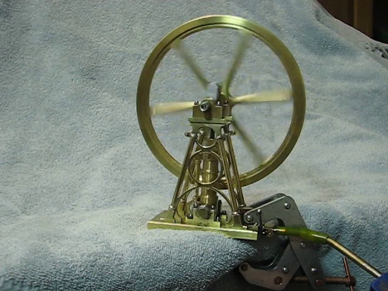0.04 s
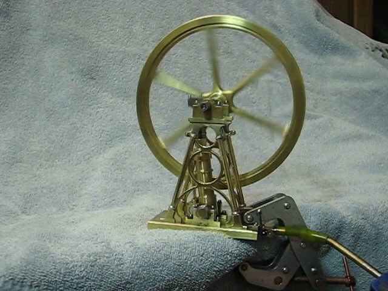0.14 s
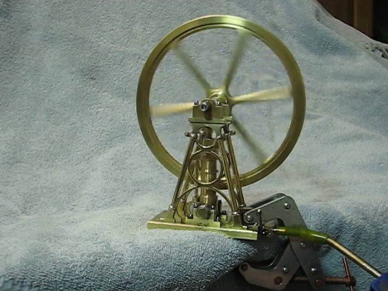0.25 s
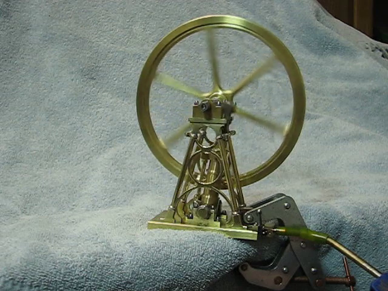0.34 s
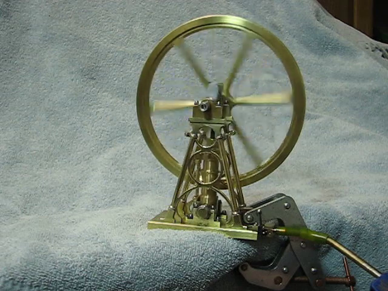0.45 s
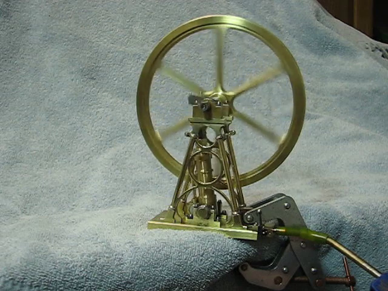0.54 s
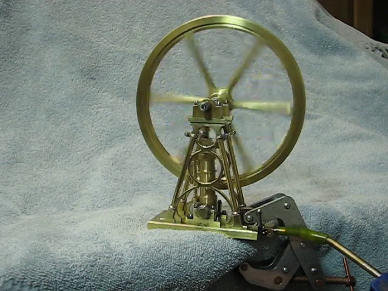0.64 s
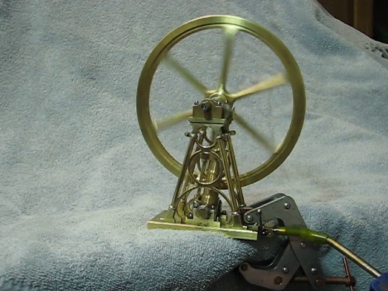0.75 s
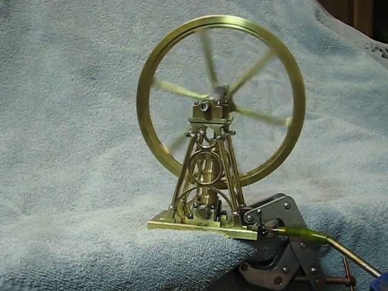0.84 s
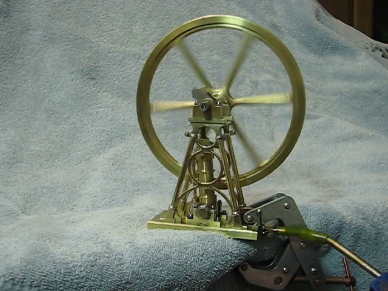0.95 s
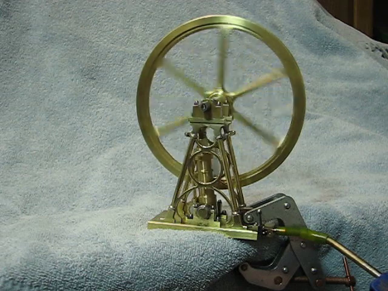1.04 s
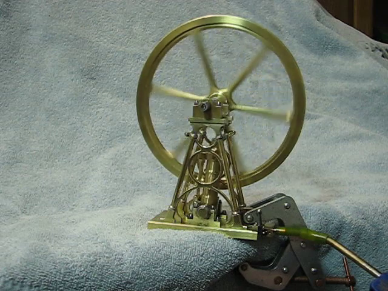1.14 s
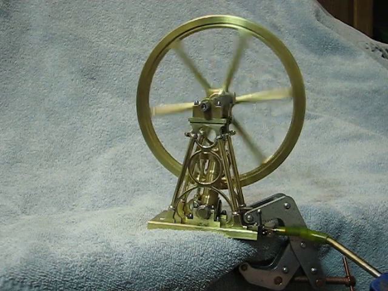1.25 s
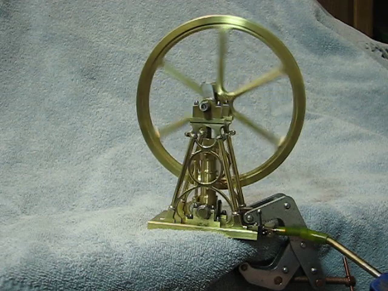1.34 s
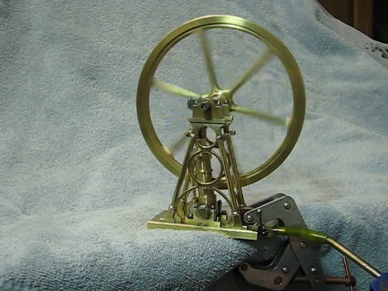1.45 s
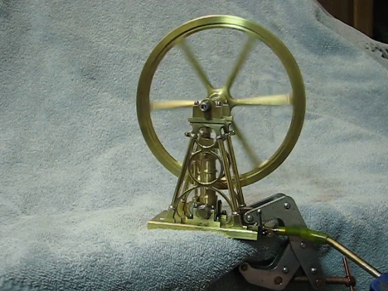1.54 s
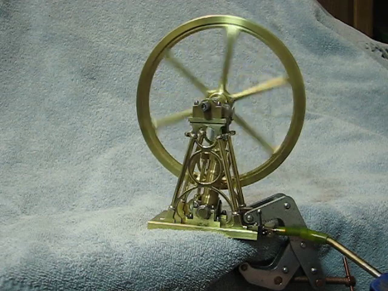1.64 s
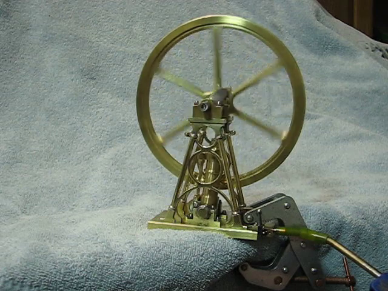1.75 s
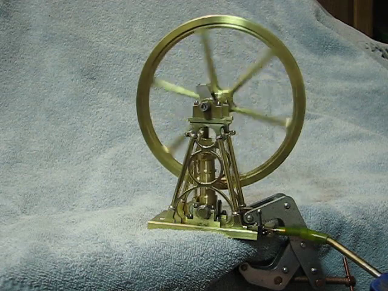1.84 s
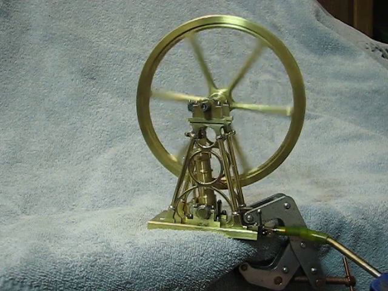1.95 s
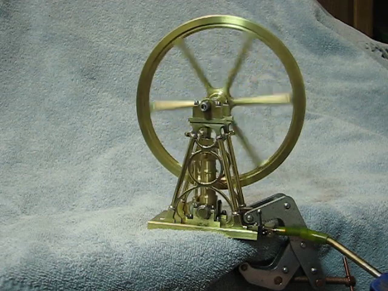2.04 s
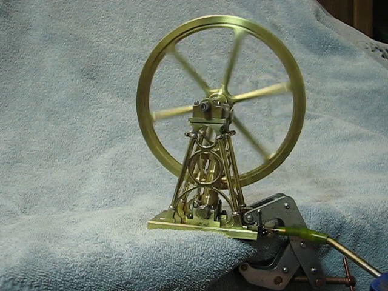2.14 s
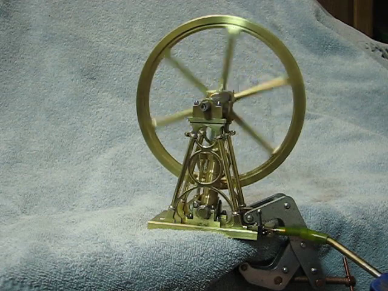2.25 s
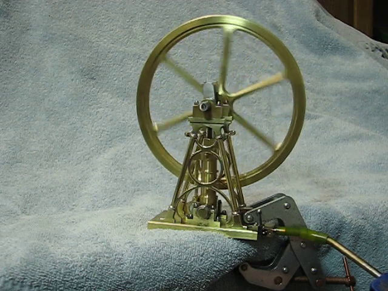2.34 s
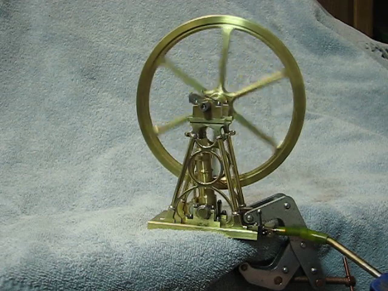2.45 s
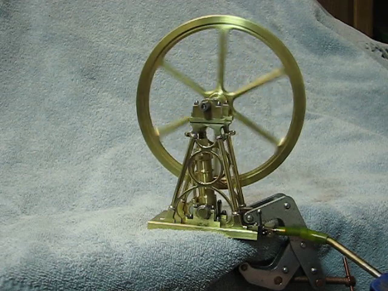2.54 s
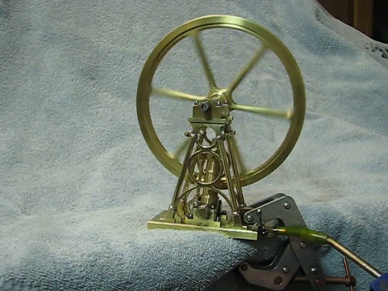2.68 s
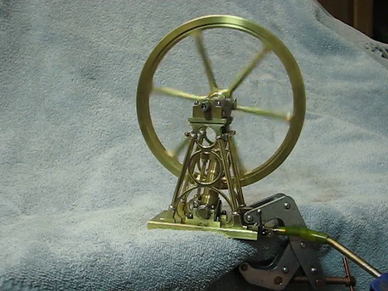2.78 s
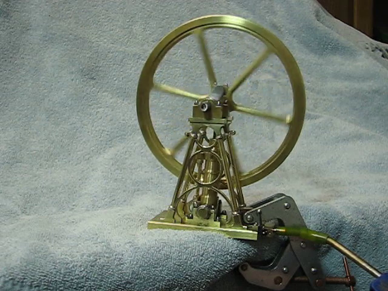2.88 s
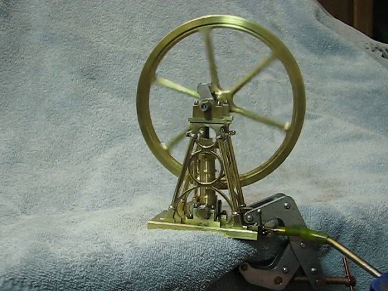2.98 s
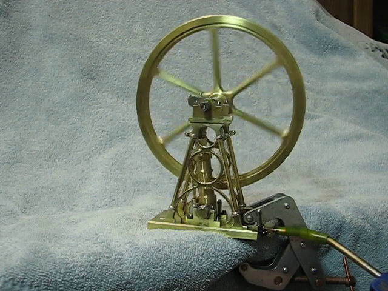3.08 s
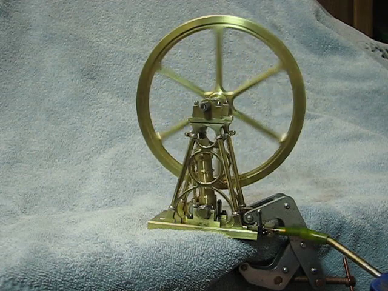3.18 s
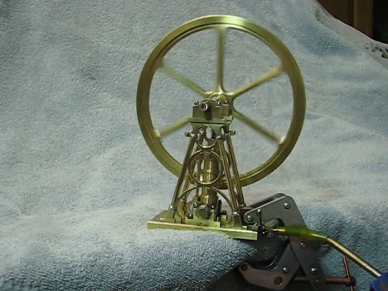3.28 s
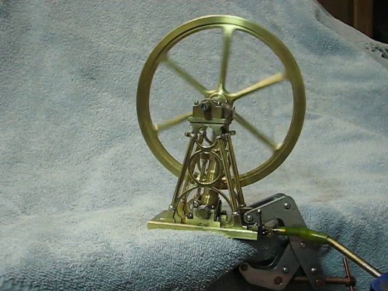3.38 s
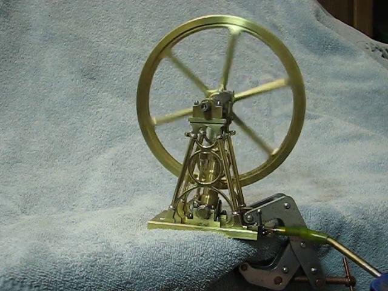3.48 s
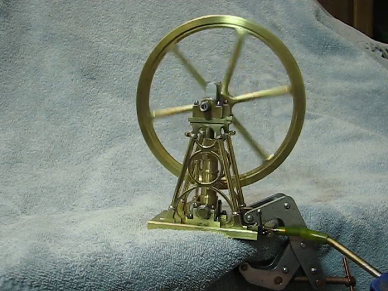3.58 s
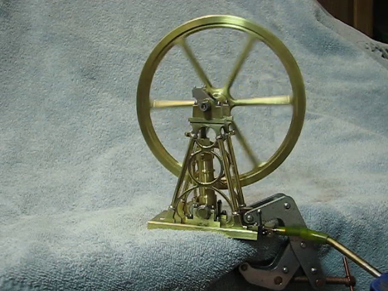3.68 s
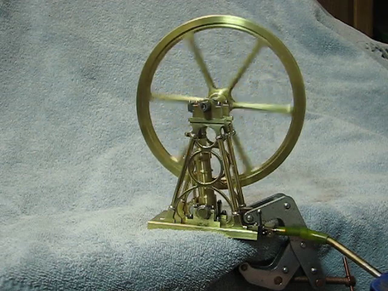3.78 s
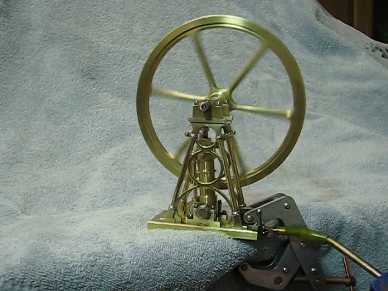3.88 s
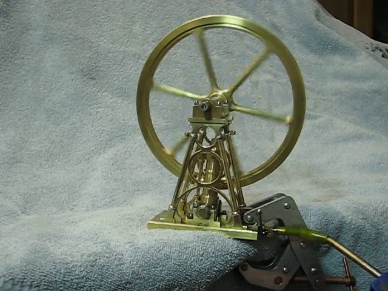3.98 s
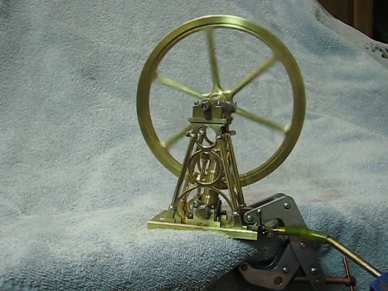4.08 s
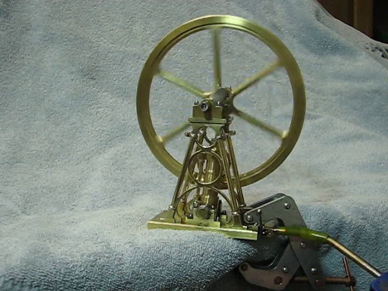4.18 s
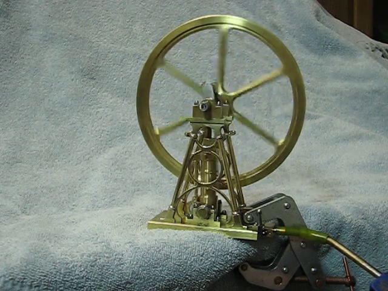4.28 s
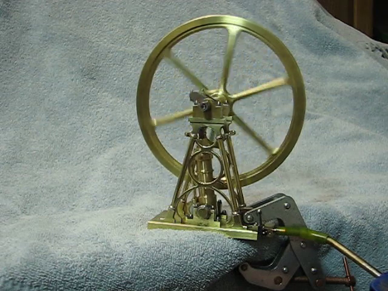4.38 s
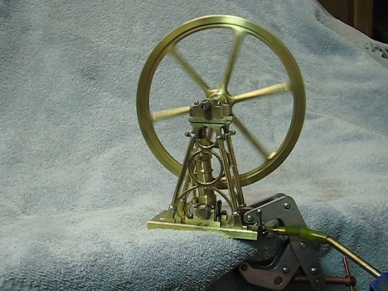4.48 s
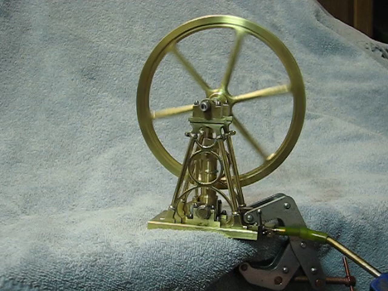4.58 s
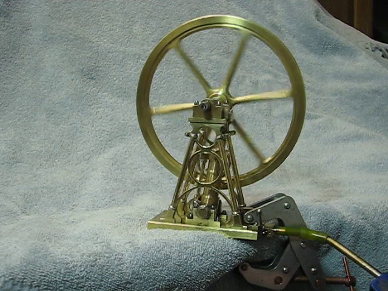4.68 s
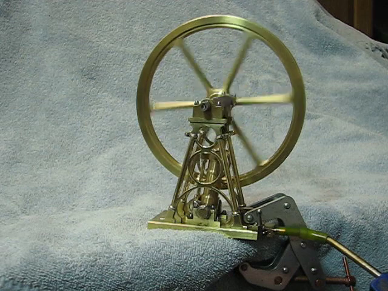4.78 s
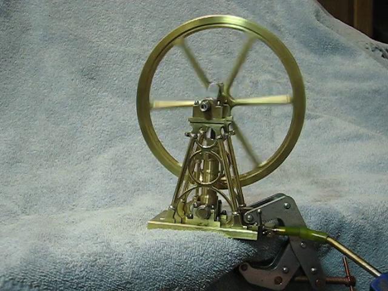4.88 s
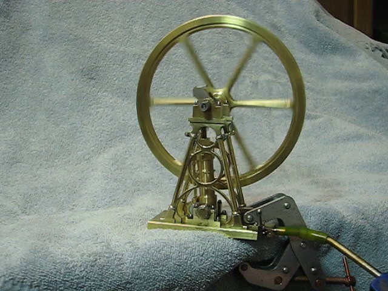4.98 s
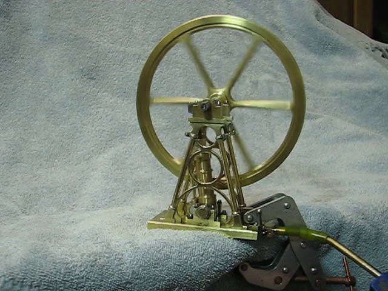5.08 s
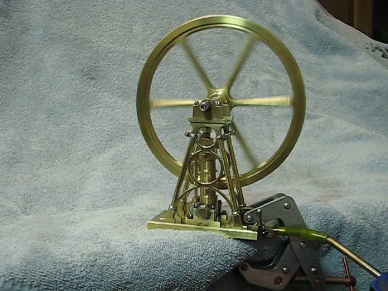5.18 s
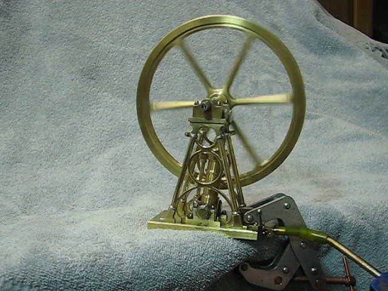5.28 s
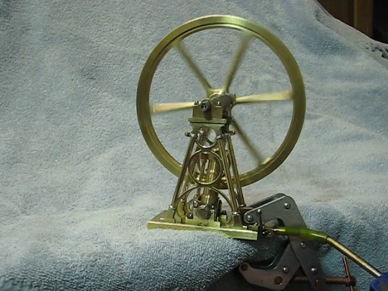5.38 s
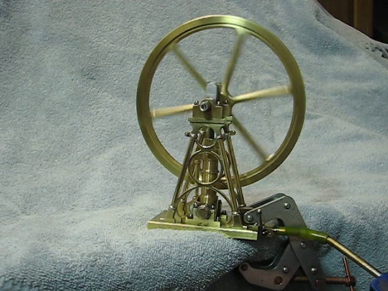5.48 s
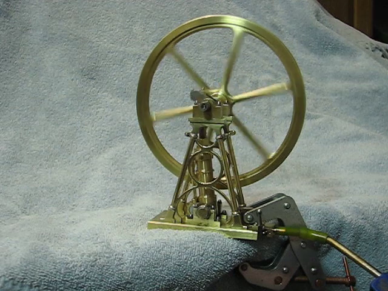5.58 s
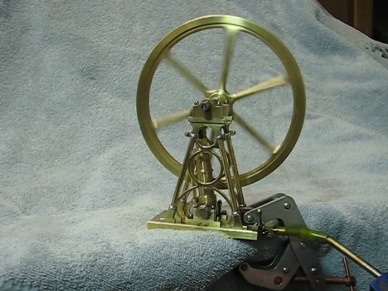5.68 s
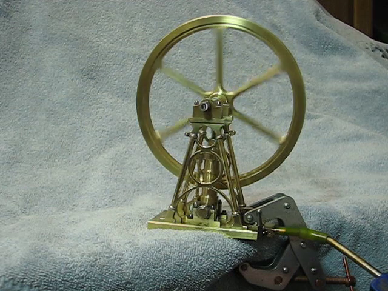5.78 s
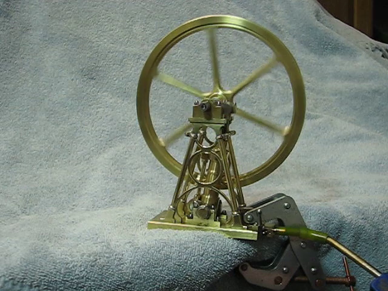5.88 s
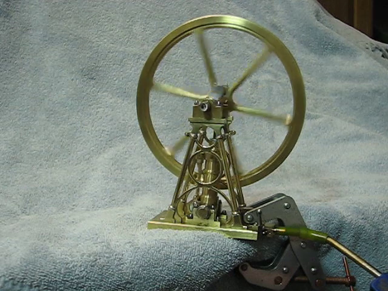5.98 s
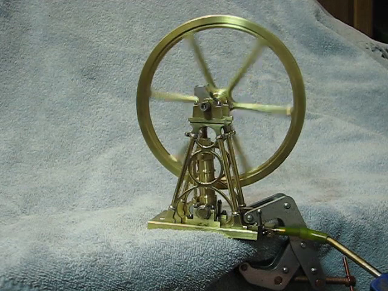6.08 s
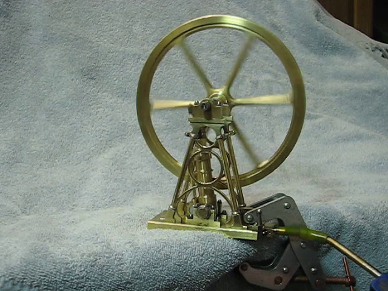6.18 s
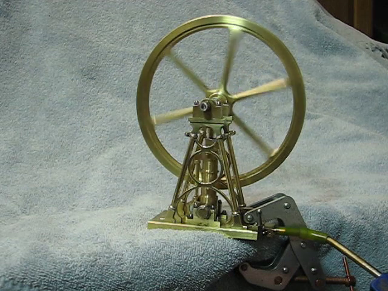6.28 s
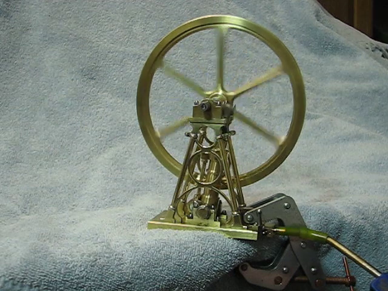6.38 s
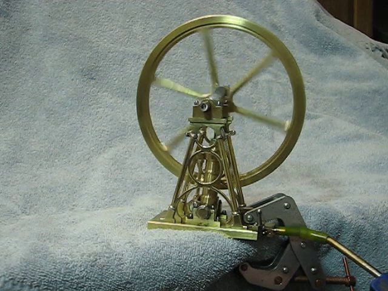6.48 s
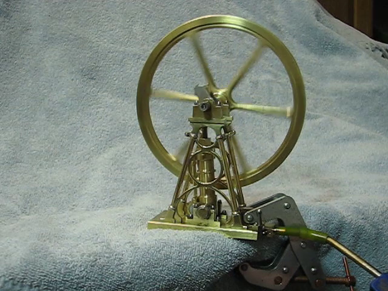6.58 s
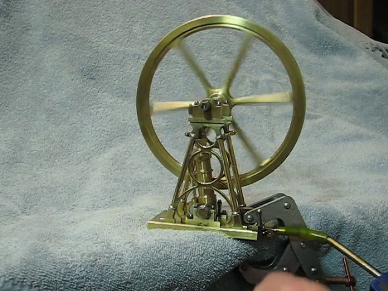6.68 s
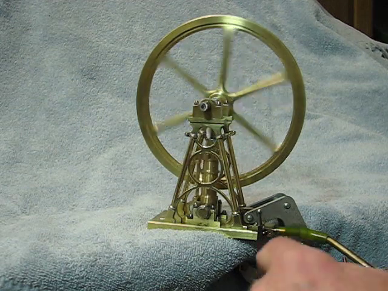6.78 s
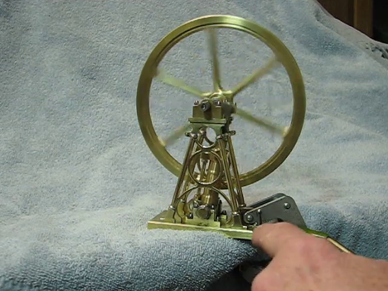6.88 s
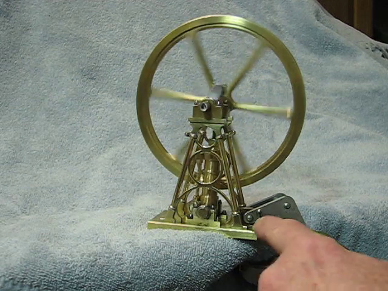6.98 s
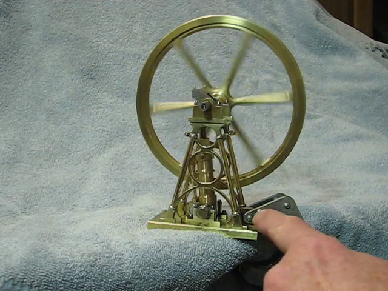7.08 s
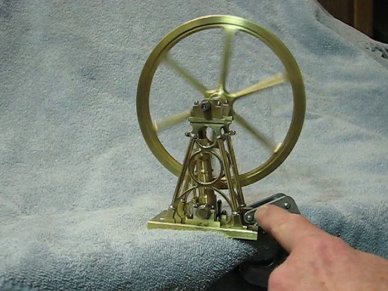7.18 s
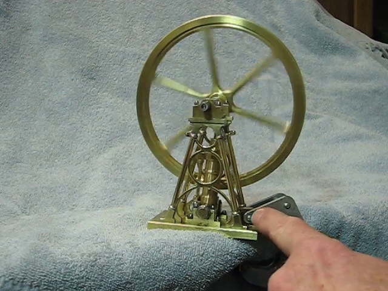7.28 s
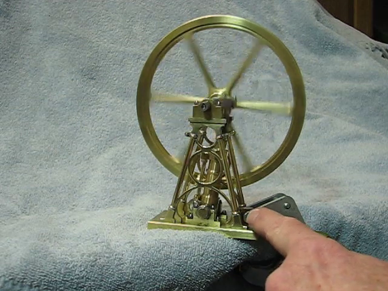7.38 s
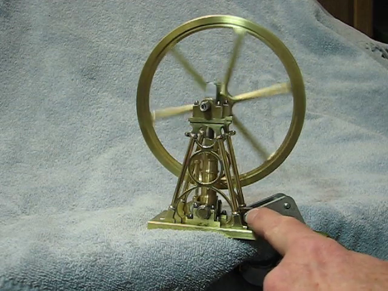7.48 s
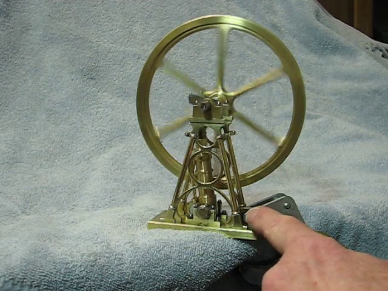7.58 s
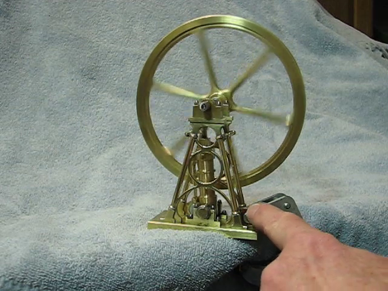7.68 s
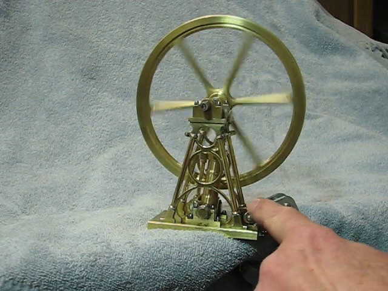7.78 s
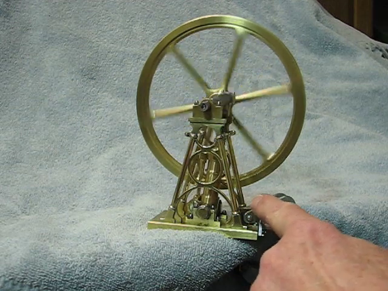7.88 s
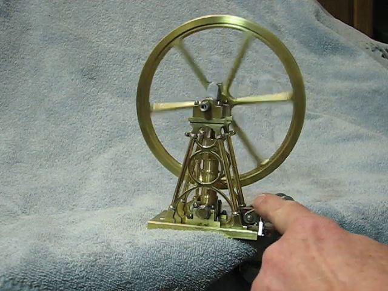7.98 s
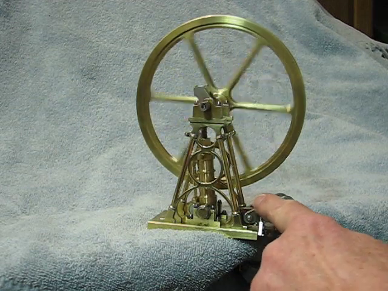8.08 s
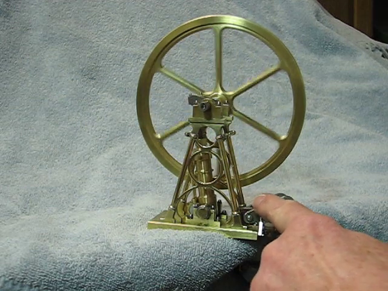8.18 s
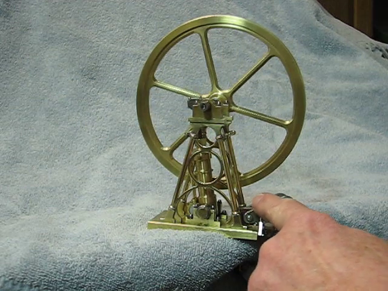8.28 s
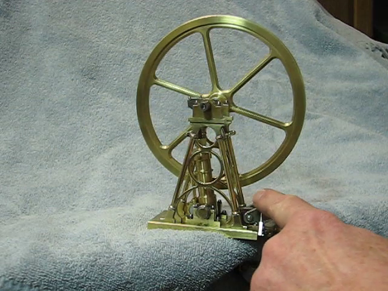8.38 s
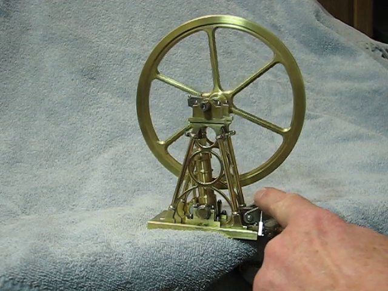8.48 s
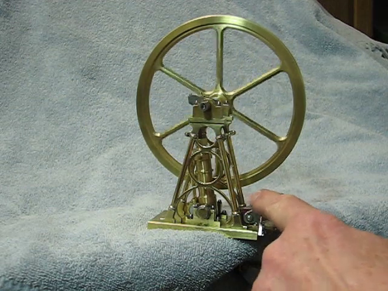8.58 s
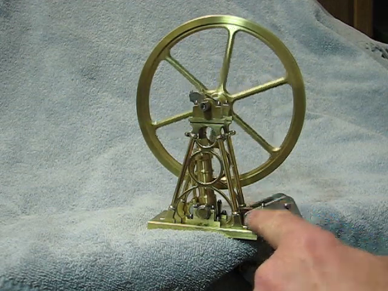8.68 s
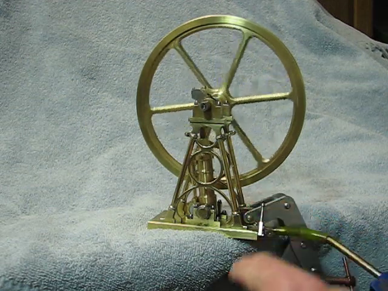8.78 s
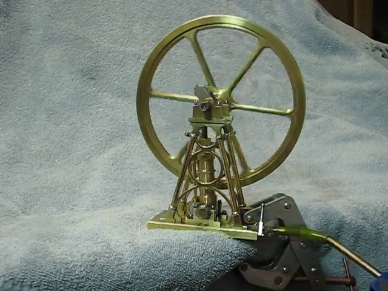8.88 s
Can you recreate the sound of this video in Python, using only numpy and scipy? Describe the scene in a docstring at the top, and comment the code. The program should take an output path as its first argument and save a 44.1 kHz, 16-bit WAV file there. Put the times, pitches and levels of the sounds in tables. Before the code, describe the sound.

Close up indoors, a miniature steam engine puffs in a quick, regular rhythm, each turn a sharp chuff followed by a sputtering swell of steam. The pace sags, then recovers as the hiss and spitting grow stronger. The engine stops abruptly, leaving one feeble stroke and two soft sighs of vapour over a thin leaking hiss and faint electrical hum.

```python
"""A small brass model steam engine runs close by on a towel, about two turns a second, over a hissing
leak, a thin whistle and mains hum. The crank angle times each turn: a sharp-edged chuff, a spit as the
valve crosses over, then a swelling puff, all turbulent flow that rings the passages and sputters with
moisture. The wheel slows, then picks up; steam pressure and speed set the strength and brightness.
Near the end a finger cuts the supply: one weak stroke follows, and a little dry vapour sighs out."""
import sys
import numpy as np
from scipy import signal
from scipy.fft import irfft
from scipy.io import wavfile

SR = 44100
rng = np.random.default_rng(int(sys.argv[2]) if len(sys.argv) > 2 else 0)


def output_pcm(signal):
    """Save a mono or channel-first signal as 16-bit PCM at the path in sys.argv[1].

    Samples are clipped to [-1, 1] before scaling.
    """
    pcm = np.clip(np.atleast_2d(signal).T, -1, 1) * 32767
    wavfile.write(sys.argv[1], SR, np.round(pcm).astype(np.int16))


N = 394235
TIME = np.arange(N) / SR
FREQS = np.maximum(np.fft.rfftfreq(N, 1 / SR), 1)

# flywheel turns and their relative sputter: start_s, chuff_db, spit_db, swell_db
FLYWHEEL_TURNS = [(-0.07, -21, -41, -21.5), (0.323, -22.2, -35, -21), (0.74, -23.5, -31.5, -21),
                  (1.18, -22.5, -35.5, -23), (1.638, -23.5, -42, -25), (2.143, -23, -39.5, -24),
                  (2.711, -24.5, -42, -24.5), (3.352, -22, -31.5, -26.5), (4.021, -22.5, -28.5, -25),
                  (4.683, -22.8, -22, -20.5), (5.288, -24, -21, -20.5), (5.842, -23.5, -22, -20.5),
                  (6.355, -23.5, -21.5, -20), (6.851, -23.3, -24, -20.5), (7.324, -23, -25, -21)]
SPIT_WIDTH_S = .0125


def from_db(db):
    """Amplitude grows tenfold every 20 decibels."""
    return 10 ** (np.asarray(db) / 20)


def rms_one(x):
    """Normalisation to unit mean power."""
    return x / np.sqrt(np.mean(x ** 2) + 1e-20)


def together(*gains):
    """Incoherent sources add in power."""
    return np.sqrt(sum(gain ** 2 for gain in gains))


def hump(offset, width):
    """A Gaussian pulse of height 1."""
    return np.exp(-.5 * np.minimum(np.abs(offset / width), 10) ** 2)


def in_time(rows):
    """Linear interpolation of a table's columns over time."""
    time_s, *columns = np.transpose(rows)
    return [np.interp(TIME, time_s, c) for c in columns]


def over_hz(rows):
    """Interpolation of a table's columns over log frequency."""
    hz, *columns = np.transpose(rows)
    return [np.interp(np.log(FREQS), np.log(hz), c) for c in columns]


def drift(rate_hz):
    """Slow random modulation of unit rms."""
    knots = rng.standard_normal(8192)
    return rms_one(np.interp(TIME * rate_hz, np.arange(len(knots)), knots))


def stereo_noise(colour=1):
    """Partial coherence: left and right share the noise to a degree that varies with frequency."""
    # likeness of the two sides: frequency_hz, coherence, left_lead_rad
    stereo_field = [(100, 0.92, 0.5), (298, .92, 0.03), (600, 0.55, 0.14), (1200, 0.92, 0.5),
                    (2650, 0.75, -0.14), (3500, 0.48, -1), (4530, 0.96, 0.5), (5400, 0.77, 1),
                    (6400, .99, -.5), (6920, .995, -1), (8300, 0.35, 1.45), (9550, 1, -0.9),
                    (10350, 0.4, -2.8), (12600, 0.5, -2), (15100, 0.2, -5.5)]
    coherence, lead = over_hz(stereo_field)
    mid, side = rng.standard_normal((2, len(FREQS))) + 1j * rng.standard_normal((2, len(FREQS)))
    mid, side = np.sqrt(1 + coherence) * mid, np.sqrt(1 - coherence) * side
    return rms_one(irfft(colour * np.array([(mid + side) * np.exp(1j * lead), mid - side]), N))


def resonate(turbulence, modes, grain=1):
    """Forced resonance: each mode band-passes its own stretch of turbulence twice; unit rms."""
    out = 0
    for hz, width_hz, level_db, pan_db in modes:
        radius = np.exp(-np.pi * width_hz / SR)
        section = [1, 0, -1, 1, -2 * radius * np.cos(2 * np.pi * hz / SR), radius ** 2]
        drive = np.roll(turbulence, rng.integers(N), axis=1) * grain
        sides = rms_one(from_db([[pan_db / 2], [-pan_db / 2]]))
        out = out + from_db(level_db) * sides * rms_one(signal.sosfilt([section, section], drive))
    return rms_one(out)


def pressure(full_db=-42.5):
    """Steam pressure drives the flows; in dB relative to full pressure."""
    # steam pressure on a loudness scale: time_s, level_db
    pressure_curve = [(0.0, -49), (1.16, -47), (1.58, -51), (1.67, -56), (2.68, -55), (2.83, -58),
                      (3.31, -50), (3.93, -48), (5.02, -42), (7.52, -44), (7.58, -46)]
    return in_time(pressure_curve)[0] - full_db


def supply(cut_s=7.72, fall_db_per_s=800):
    """Throttling: the supply's gain decays exponentially once it is pinched off."""
    return from_db(-np.clip(fall_db_per_s * (TIME - cut_s), 0, 120))


def crank(end_s=7.782):
    """Rotation times the valve: turn number, angle (turns) and speed (turns a second)."""
    starts = np.append(np.transpose(FLYWHEEL_TURNS)[0], end_s)
    turns = np.interp(TIME, starts, np.arange(len(starts)))
    turn = np.minimum(turns.astype(int), len(FLYWHEEL_TURNS) - 1)
    return turn, turns - turn, 1 / np.diff(starts)[turn]


def strength(engine, level_db, per_pressure, per_speed, cruise_hz=2):
    """A flow's gain is a power law of pressure and wheel speed; slopes in dB per dB."""
    _, speed, pressure_db = engine
    return from_db(level_db + per_pressure * pressure_db + per_speed * 20 * np.log10(speed / cruise_hz))


def chuff(engine, dome_db, crack_db, open_s=.0095, shut_s=.0075, crack_s=.01):
    """Blowdown: pent-up pressure cracks out of the port, then flow follows the piston's speed."""
    angle, speed, pressure_db = engine
    shut_angle = .259 + .0014 * pressure_db
    since_open, since_shut = angle / speed, np.maximum(angle - shut_angle, 0) / speed
    stroke = np.minimum(2 * angle / shut_angle - 1, 1)  # 0 at mid-stroke
    port = np.minimum(since_open / open_s, 1) * np.exp(-since_shut / shut_s)
    return port * from_db(crack_db * np.exp(-since_open / crack_s) - dome_db * stroke ** 2)


def droplets(per_s=650, spread_db=2, burst_s=.00047, smooth_share=.5, clump_db=1.12, clump_hz=110):
    """Shot noise: droplets tear off the port at random and make the flow's envelope grainy."""
    sizes = from_db(spread_db * np.minimum(rng.exponential(1, N), 3))
    born = rng.random(N) < per_s / SR
    power = signal.lfilter([1], [1, -np.exp(-1 / (burst_s * SR))], born * sizes ** 2 + 1e-18)
    clumps = from_db(clump_db * drift(clump_hz))
    return np.sqrt(smooth_share + (1 - smooth_share) * power / power.mean()) * clumps


def leak(turbulence, full_db=-40.2, shut_db=-44.5):
    """Jet noise at the glands follows the pressure, then holds its level after the cut."""
    # resonances of the gaps: centre_hz, width_hz, level_db, pan_db
    gland_modes = [(645, 770, -16.5, 0), (1765, 1160, -9.5, -1), (3080, 1800, -4.5, -4),
                   (4160, 1100, -6.5, 15), (5150, 1800, -3, -10), (6620, 1000, -4, 17),
                   (7320, 1200, -1.5, -24), (8330, 630, -1, -4), (9800, 3300, -3, 5.5),
                   (12250, 650, -10, 1), (13350, 700, -12, 6), (14100, 2200, -12, -5)]
    fed = supply()
    level_db = fed * (full_db + 1.17 * pressure()) + (1 - fed) * shut_db
    return from_db(level_db + .8 * drift(25)) * resonate(turbulence, gland_modes)


def whistle(gain_db=5.3, width_hz=330, skirt_hz=750, pan_db=-11.5, lead_rad=-2.1):
    """A pinhole jet resonates in a narrow band of hiss with soft skirts."""
    # course of the jet's tone: time_s, relative_db, pitch_hz
    pinhole_tone = [(0.0, -57, 13000), (0.42, -55, 13000), (3.81, -55, 13000), (4.46, -52, 13100),
                    (6.27, -54, 13100), (6.62, -57, 13100), (8.09, -59, 13100), (8.94, -57, 13100)]
    level_db, pitch_hz = in_time(pinhole_tone)
    cycles = np.cumsum(pitch_hz) / SR
    flutter = rng.standard_normal(N) + 1j * rng.standard_normal(N)
    for band_hz in (width_hz, skirt_hz):
        flutter = signal.lfilter([1], [1, -np.exp(-np.pi * band_hz / SR)], flutter)
    sides = np.array([[from_db(pan_db) * np.exp(1j * lead_rad)], [1]])
    return from_db(level_db + gain_db) * rms_one(np.real(flutter * np.exp(2j * np.pi * cycles) * sides))


def room_tone():
    """Broadband rumble lies under mains hum, whose lines are broadened by random modulation."""
    # spectral density of the rumble: frequency_hz, relative_db
    rumble_spectrum = [(12, -0.5), (28, 4), (40, -3.5), (52, -4.5), (65, -4.5), (100, -1.5), (170, -1.5),
                       (240, -1.5), (330, -5), (430, -9), (750, -10), (980, -12), (1200, -9), (1400, -13),
                       (1900, -12.5), (3000, -17.5), (15000, -28.5)]
    # lines of the hum: pitch_hz, level_db, waver_depth
    hum_lines = [(119.6, -57.5, 0.03), (238.7, -64, 0.97), (326.4, -68.5, .5)]
    rumble = from_db(-52.5) * stereo_noise(from_db(over_hz(rumble_spectrum)[0]))
    hum = 0
    for hz, level_db, waver in hum_lines:
        wavering = 1 + waver * (drift(12) + 1j * drift(13))
        hum = hum + from_db(level_db) * rms_one(np.real(wavering * np.exp(2j * np.pi * hz * TIME)))
    return rumble + hum


def crossover(engine, at_turns=.364, lag_turns=0):
    """A pulse of flow escapes as the valve crosses over, earlier at low pressure."""
    angle, speed, pressure_db = engine
    return hump((angle - at_turns - lag_turns - .0009 * pressure_db) / speed, SPIT_WIDTH_S)


def spits(engine, main_gain):
    """Two-phase flow: envelopes of two spits a turn, each wet first and dry just after."""
    faint_gain = strength(engine, -33, per_pressure=1.55, per_speed=-1)
    wet = dry = 0
    for at_turns, gain in ((.364, main_gain), (.93, faint_gain)):
        wet = wet + gain * crossover(engine, at_turns)
        dry = dry + from_db(-15) * gain ** .88 * crossover(engine, at_turns, lag_turns=.01)
    return wet, dry


def swell(engine, widths, early_turns=0, open_turns=.33, peak_turns=.682, shut_turns=.985):
    """Displacement flow: the return stroke pushes a puff through the valve, briefer at low pressure."""
    angle, _, pressure_db = engine
    opening = np.minimum(angle - open_turns, shut_turns - angle) + .003 * pressure_db
    valve = np.clip(opening / .075, 0, 1)
    return valve * hump(angle - peak_turns + early_turns, widths * (.07 + .0016 * pressure_db))


def exhaust(turbulence):
    """Source and filter: wet sputter, fine spray and each stroke's rush excite their own resonances."""
    # resonances of port and passages: centre_hz, width_hz, level_db, pan_db
    sputter_modes = [(6708, 570, -0.5, -3), (7120, 460, -4.5, -14), (6290, 720, -10.5, 2),
                     (8210, 930, -18.5, -2), (7500, 350, -14, -5)]
    spray_modes = [(9440, 640, 1.5, 6.5), (8540, 360, -7, 1), (9890, 770, -9, 15), (10630, 2500, -11.5, 6),
                   (11730, 600, -8, -2), (13100, 1500, -20, -6), (14600, 1000, -25, -4)]
    chuff_modes = [(685, 890, -17, -2), (1083, 220, -20, 0), (2370, 1900, -13.5, 7), (2728, 600, 1, -5.5),
                   (3150, 450, -4.5, -14), (3650, 350, -11, 5), (4230, 540, -0.5, 0.5),
                   (4800, 1040, -3.5, -4.5)]
    swell_modes = [(720, 750, -21.5, -3.5), (1116, 270, -19.5, 1.5), (2080, 3300, -10.5, 2),
                   (2800, 690, -2, -7), (3200, 700, -9, -10), (4220, 790, -2.5, 1.5), (4920, 1300, 1, -3.5)]
    seep_modes = [(2780, 800, -1, -5), (3138, 410, 1, -9.5), (4310, 520, -2.5, -0.5),
                  (4740, 370, -10.5, -3), (7600, 1300, -9.5, -4), (8470, 680, -14.5, 0)]
    turn, angle, speed = crank()
    engine = angle, speed, pressure()
    chuff_wet, spit_gain, swell_wet = from_db(np.transpose(FLYWHEEL_TURNS)[1:])[:, turn]
    spit_wet, spit_dry = spits(engine, spit_gain)

    # moisture comes mostly at the crest of the swell, thinly on its skirts
    crest, skirts = swell(engine, widths=.98), swell(engine, widths=2.6, early_turns=.05)
    sputter = from_db(-1.5) * together(chuff_wet * chuff(engine, dome_db=8.5, crack_db=5.5),
                                       swell_wet * together(crest, from_db(-12.3) * skirts), spit_wet)
    # spray tops the strongest strokes
    chuff_spray = strength(engine, -29.2, per_pressure=.56, per_speed=1)
    swell_spray = strength(engine, -33.3, per_pressure=.55, per_speed=1.65)
    spray = together(chuff_spray * chuff(engine, dome_db=12.5, crack_db=3),
                     swell_spray * together(crest, from_db(-13) * skirts), from_db(-14.5) * spit_wet)
    chuff_dry = strength(engine, -37.7, per_pressure=.09, per_speed=.1)
    swell_dry = strength(engine, -33.2, per_pressure=.12, per_speed=.15)
    chuff_rush = chuff_dry * chuff(engine, dome_db=8, crack_db=7.5)
    swell_rush = together(swell_dry * swell(engine, widths=1.42, early_turns=.002), spit_dry)
    # slow flow in the spit and around the return stroke sings in the narrow passage
    seep = swell_dry * together(from_db(-6.5) * swell(engine, widths=3.3, early_turns=.052),
                                from_db(-9.5) * crossover(engine))

    fed, grain = supply(), droplets()
    out = (fed * sputter + last_stroke(-44)) * resonate(turbulence, sputter_modes, grain)
    out += fed * spray * resonate(turbulence, spray_modes, grain ** .66)
    out += fed * chuff_rush * resonate(turbulence, chuff_modes, grain ** .5)
    out += (fed * swell_rush + last_stroke(-41)) * resonate(turbulence, swell_modes, grain ** .4)
    return out + fed * seep * resonate(turbulence, seep_modes)


def side_branch(x, hz=5700, width_hz=450, depth=.29):
    """Antiresonance: a side branch of the passages swallows one band and leaves the hiss hollow."""
    return x - depth * signal.lfilter(*signal.iirpeak(hz, hz / width_hz, fs=SR), x)


def last_stroke(level_db, at_s=8.014, width_s=.015):
    """Inertia carries the wheel through one weak pulse of flow after the cut."""
    return from_db(level_db) * hump(TIME - at_s, width_s)


def sighs(turbulence, attack_s=.085, release_s=.085, trickle_db=-57):
    """Residual pressure drains from the stopped engine in sighs over a faint trickle."""
    # escapes of vapour: start_s, hold_s, level_db
    escapes = [(8.21, .29, -41), (8.76, .12, -45)]
    # resonances of the draining passage: centre_hz, width_hz, level_db, pan_db
    drain_modes = [(2770, 850, -4.5, -4), (3150, 530, -2, -6), (3650, 400, -10, -6), (4290, 340, -0.5, 1),
                   (6960, 1600, -15, -7)]
    drain = 0
    for start_s, hold_s, level_db in escapes:
        rise = np.clip((TIME - start_s) / attack_s, 0, 1)
        fall = np.exp(-np.maximum(TIME - start_s - hold_s, 0) / release_s)
        drain = drain + from_db(level_db) * rise * fall
    trickle = from_db(trickle_db) * (1 - supply())
    return together(drain, trickle) * resonate(turbulence, drain_modes, from_db(1.3 * drift(60)))


def workshop(x, tail_db=-18.5, t60_s=.28):
    """Reverberation: early reflections from near surfaces and a short diffuse tail."""
    # early reflections: left_delay_s, right_delay_s, level_db
    reflections = [(.00612, 0.0091, -22.5), (.00715, 0.0099, -26), (.00948, .00952, -13),
                   (.01065, 0.0057, -20.5), (.01275, .01238, -24.5), (.0217, .0207, -37)]
    t = TIME[:SR // 3]
    response = rng.standard_normal((2, len(t))) * from_db(-60 * t / t60_s) * (t > reflections[0][0])
    response *= from_db(tail_db) / np.sqrt(np.sum(response ** 2, axis=1, keepdims=True))
    response[:, 0] = 1  # direct sound
    for left_s, right_s, level_db in reflections:
        response[[0, 1], [round(left_s * SR), round(right_s * SR)]] += from_db(level_db)
    return signal.fftconvolve(x, response, axes=1)[:, :N]


def scene():
    """Superposition of the engine's flows, their reflections and the room tone."""
    turbulence = stereo_noise()
    steam = side_branch(exhaust(turbulence)) + leak(turbulence) + sighs(turbulence) + whistle()
    return workshop(steam) + room_tone()


def record(dry, cutoff_hz=15600):
    """Band limiting: an elliptic low-pass cuts the top steeply."""
    return signal.sosfilt(signal.ellip(10, .2, 80, cutoff_hz, fs=SR, output="sos"), dry)


dry = scene()
out = record(dry)
output_pcm(out)
```